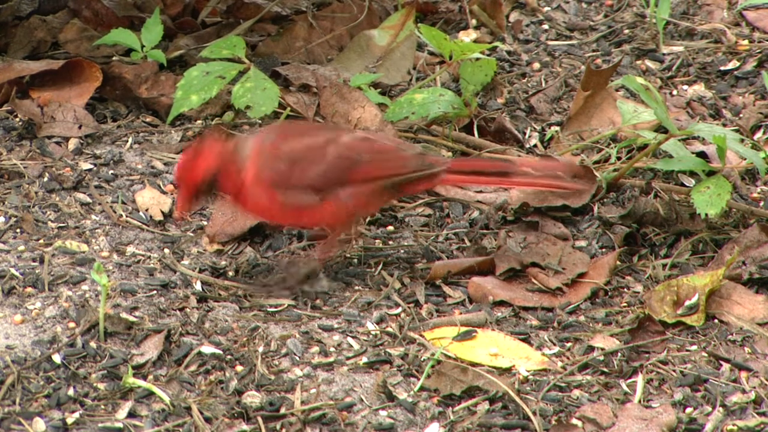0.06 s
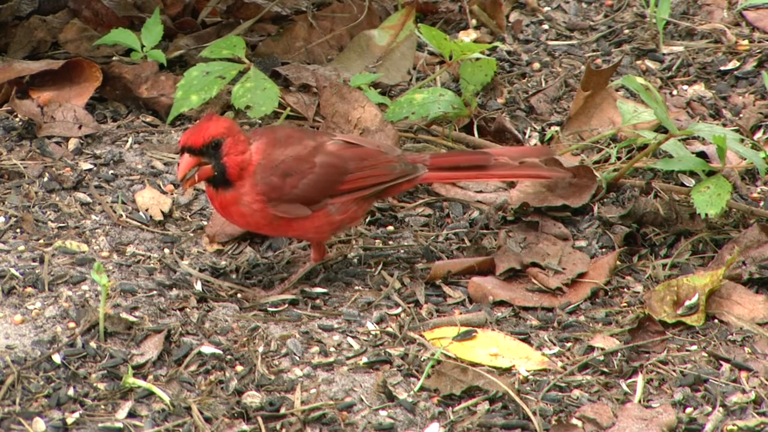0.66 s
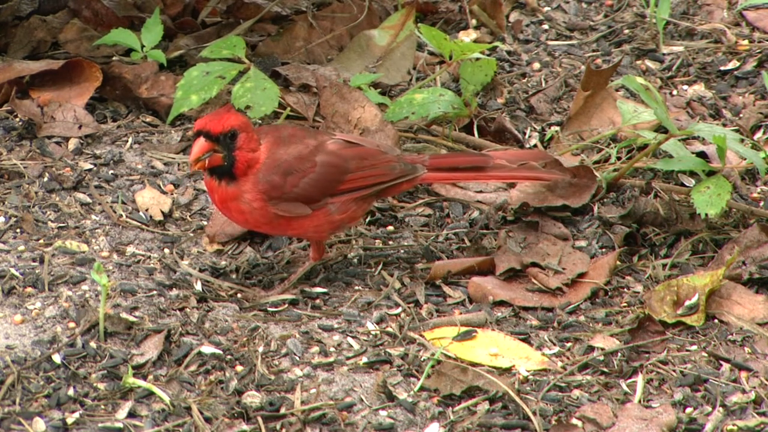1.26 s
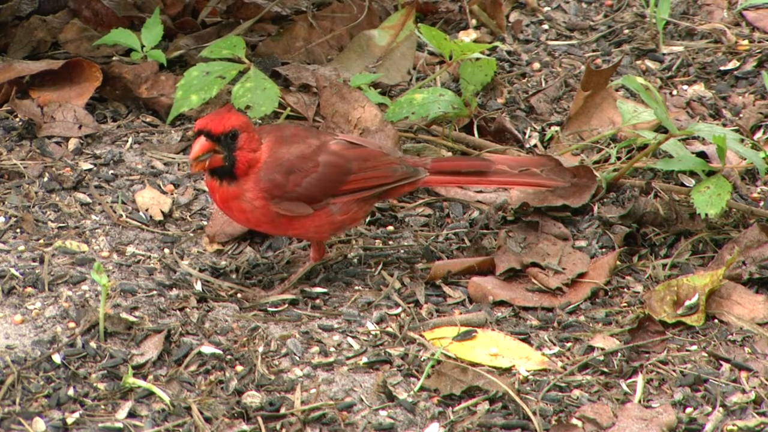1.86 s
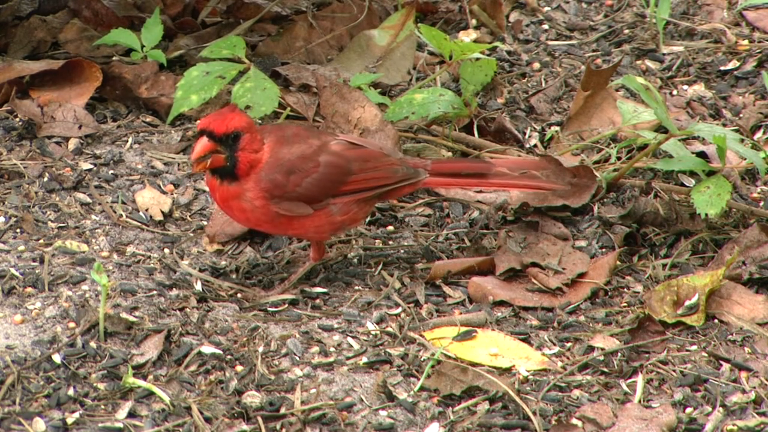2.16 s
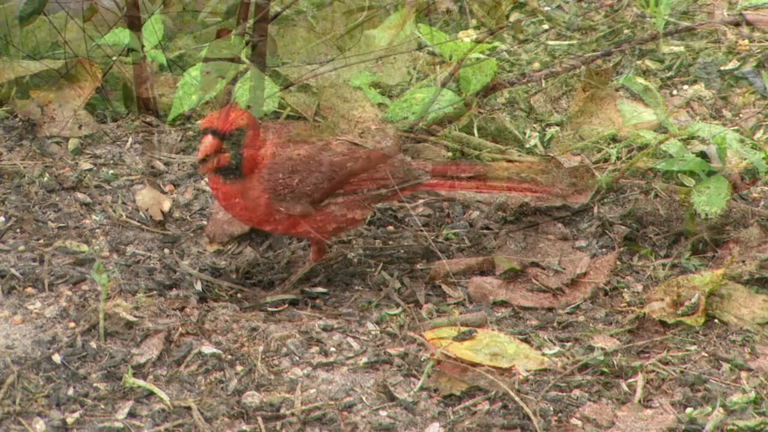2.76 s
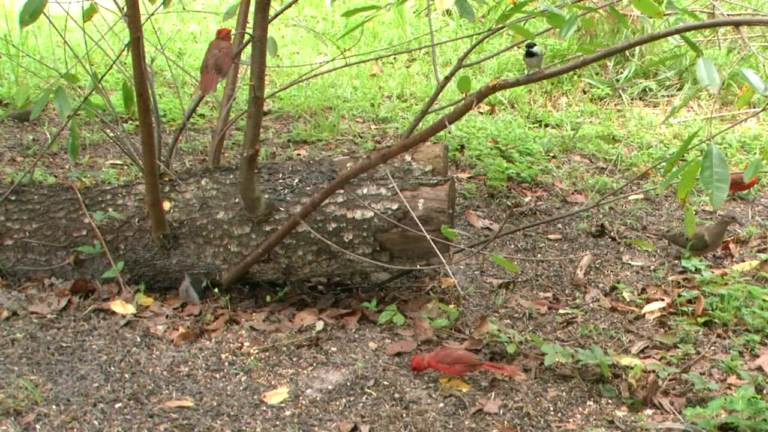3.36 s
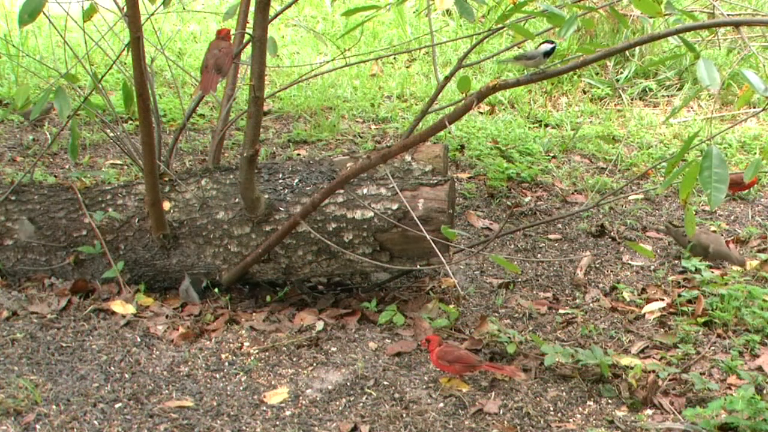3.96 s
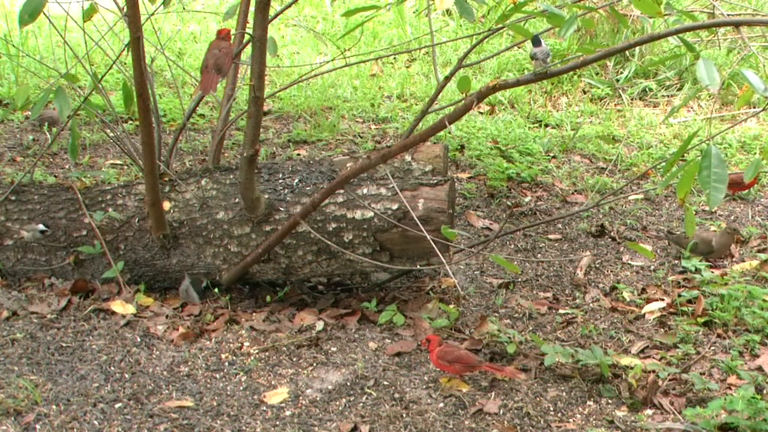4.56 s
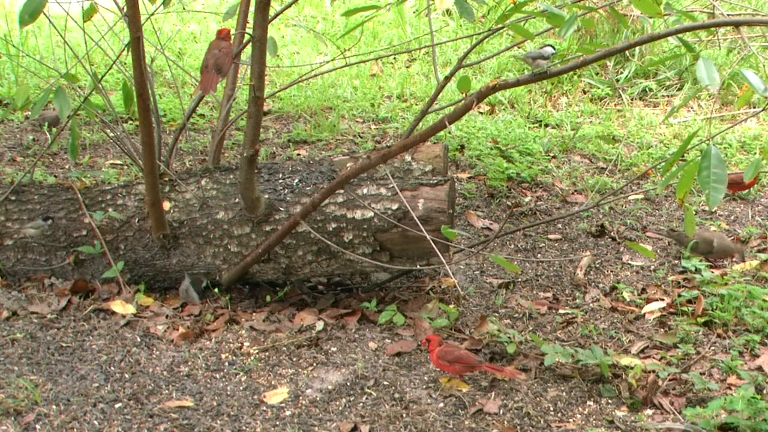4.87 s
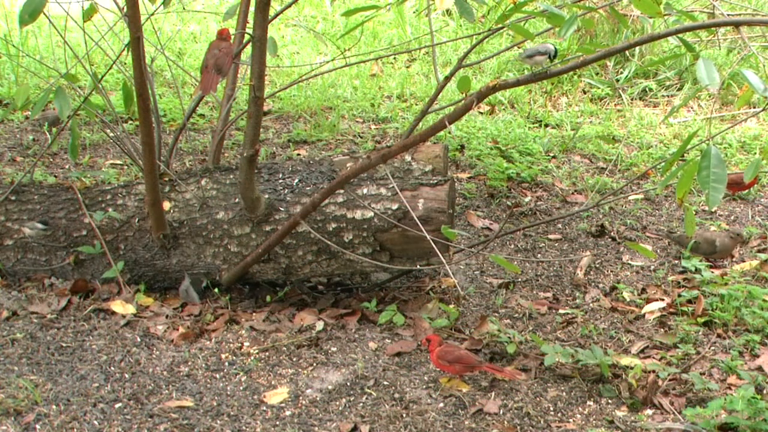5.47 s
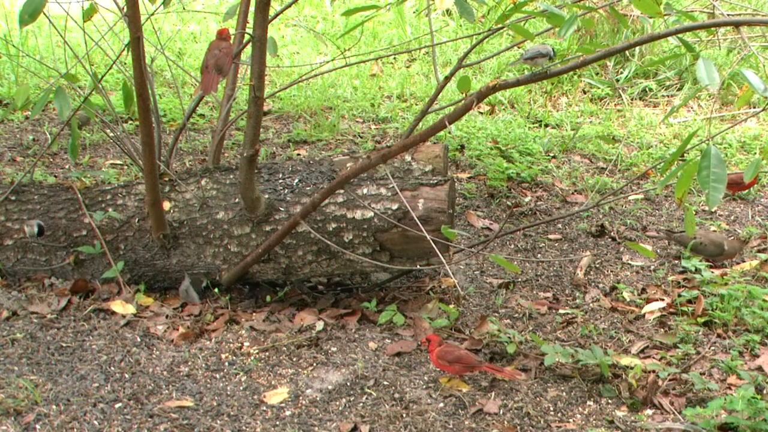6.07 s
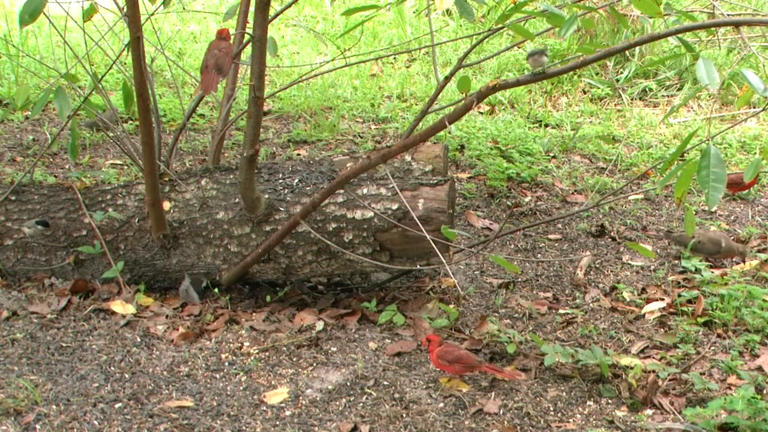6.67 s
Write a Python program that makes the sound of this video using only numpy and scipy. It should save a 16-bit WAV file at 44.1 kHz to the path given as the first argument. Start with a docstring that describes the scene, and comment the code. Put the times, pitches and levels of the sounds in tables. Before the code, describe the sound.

At the edge of a wood, high insects drone softly over a distant rumble and faint motor hum. Small songbirds give a few thin, sharp chips and a far buzzy trill. One loud chip leads straight into four hoarse chattering notes, and a second bird answers with two softer ones. A last chip follows. Seeds and dry leaves tick lightly throughout, and the calls carry a slight echo from the trees.

```python
"""A wood's edge. Throughout, high insects swell over far rumble and the hum of a distant machine,
while seeds and dry litter tick as small songbirds feed. A thin chip comes at 1.3 s, a far buzzy
trill at 1.8 s, then two more chips and, at 3.8 s, one loud arched note. Four hoarse two-voiced
'dee' notes follow at once and two softer ones answer; a faint chip and a last one at 6.6 s close.
Trunks and leaves scatter every call."""
import sys
import numpy as np
from scipy import signal
from scipy.fft import rfft, irfft, next_fast_len
from scipy.io import wavfile

SR = 44100
rng = np.random.default_rng(int(sys.argv[2]) if len(sys.argv) > 2 else 0)


def int16_out(signal):
    """Quantize to a 16-bit WAV file."""
    q = np.round(np.clip(np.atleast_2d(signal).T, -1, 1) * 32767)
    wavfile.write(sys.argv[1], SR, q.astype(np.int16))


N = 296793
T = np.arange(N) / SR
HISS_TOP_HZ = 13800


def from_db(db):
    return 10 ** (np.asarray(db) / 20)


def unit_rms(x):
    return x / np.sqrt(np.mean(x ** 2) + 1e-20)


def at_hz(points, hz):
    """Read a curve along a log-frequency axis."""
    known_hz, values = np.transpose(points)
    return np.interp(np.log(np.maximum(hz, 1)), np.log(known_hz), values)


def drift(rate_hz, size):
    """Random modulator of spread 1, gliding to a new value `rate_hz` times a second."""
    at = np.arange(size) * rate_hz / SR
    return np.interp(at, np.arange(size), rng.standard_normal(size)) * np.sqrt(3 / 2)


def envelope(start, end, attack_s, release_s):
    """Linear fade in, hold and fade out."""
    return np.clip(np.minimum((T - start) / attack_s, (end - T) / release_s), 0, 1)


def coloured_noise(spectrum, correlation=((1000, 0),), size=N):
    """Stereo noise of the given colour and left-right correlation; rms 1."""
    padded = next_fast_len(size, True)
    hz = np.fft.rfftfreq(padded, 1 / SR)
    white = rfft(rng.standard_normal((2, padded)))
    mid, side = white * from_db(at_hz(spectrum, hz)) * (hz < HISS_TOP_HZ)
    alike = np.clip(at_hz(correlation, hz), -.95, .95)
    stereo = np.sqrt(1 + alike) * mid + np.sqrt(1 - alike) * side * [[1], [-1]]
    return unit_rms(irfft(stereo, padded)[:, :size])


def place(x, pan_db=0., lead_ms=0.):
    """A bird to the left (positive values) is louder and earlier in the left ear."""
    shift_s = lead_ms / 2000
    return np.array([from_db(side * pan_db / 2) * np.interp(T + side * shift_s, T, x)
                     for side in (1, -1)])


def woods(x, near_db, far_db, near_t60=.09, far_t60=.42, predelay_s=.0023, width=.52, leaf_cut_hz=9500):
    """Twigs near the bird throw back a quick spray of echoes, the trees further off a thin tail."""
    t = np.arange(SR * 3 // 4) / SR
    response = 0
    for level_db, t60 in ((near_db, near_t60), (far_db, far_t60)):
        mid, side = rng.standard_normal((2, len(t))) * from_db(-60 * t / t60) * (t > predelay_s)
        echoes = np.array([mid + width * side, mid - width * side])
        response += from_db(level_db) * echoes / np.sqrt(np.sum(echoes ** 2) / 2)
    # leaves soak up the highest overtones
    response = signal.sosfilt(signal.butter(2, leaf_cut_hz, fs=SR, output="sos"), response)
    return signal.oaconvolve(x, response, axes=1)[:, :N]


def air(level_db=-55):
    """The bed: far rumble and leaf hiss, arriving steadily from all round."""
    # colour of the bed: f/Hz, relative level/dB
    spectrum = [(20, -33), (45, -27), (70, -12.5), (120, -9.5), (250, -2.5), (500, -1), (680, -1.5),
                (830, 0), (1100, -4.5), (2000, -8), (4500, -12.5), (7000, -14.5), (10000, -16),
                (13500, -20.5)]
    # its stereo image: f/Hz, left-right correlation
    correlation = [(60, 0.3), (130, -0.18), (290, -0.52), (640, -0.25), (1400, -0.22), (3100, 0.087),
                   (12000, 0.28)]
    return from_db(level_db) * coloured_noise(spectrum, correlation)


def machine(wander=.0019, ear_phase_rad=.93, rise_db_per_s=.44):
    """A far motor's hum wavers a little on its way through the air and slowly grows."""
    # motor partials: f/Hz, mid-scene level/dB
    partials = [(72, -91), (118.4, -83), (585, -65), (728, -74), (1168, -77), (2191, -76.5)]
    wavering_time = np.cumsum(1 + wander * drift(14, N)) / SR
    flutter_db = 1.2 * drift(8, N)
    ear_phases = np.array([[0], [ear_phase_rad]])
    hum = sum(np.sqrt(2) * from_db(level_db) * np.sin(2 * np.pi * hz * wavering_time - ear_phases)
              for hz, level_db in partials)
    return from_db(rise_db_per_s * (T - T.mean()) + flutter_db) * hum


def insects(chorus_db=-58.5, stroke_hz=63, throb=.16, wander=.0149):
    """Wing strokes pulse a narrow band of rasp; bouts swell out of the steady chorus and sink back."""
    # colour of the rasp: f/Hz, relative level/dB
    spectrum = [(6800, -30.5), (7500, -16), (8000, -7), (8350, -2.5), (8700, -2.5), (9050, -7.5),
                (9400, -17.5), (10000, -36)]
    # bouts of the nearest insect: start/s, end/s, level/dB
    bouts = [(0, .5, -57.5), (0.522, 1.217, -56.5), (1.27, 1.773, -57), (1.838, 2.3, -56.5),
             (2.332, 2.867, -56), (2.85, 3.27, -61), (3.27, 3.882, -56.5), (3.973, 4.64, -59),
             (4.95, 5.6, -59.5), (5.75, 6.41, -60.5), (6.46, 6.9, -59)]
    swells = sum(from_db(level_db) * envelope(start, end, attack_s=.17, release_s=.12)
                 for start, end, level_db in bouts)
    phase = 2 * np.pi * np.cumsum(stroke_hz * (1 + wander * drift(7.8, N))) / SR
    strokes = unit_rms(np.exp(throb * (np.cos(phase) + .5 * np.cos(2 * phase))))
    return np.hypot(from_db(chorus_db), swells) * strokes * coloured_noise(spectrum)


def litter(t60=.045):
    """Husks and dry leaves snap: a click with a brief crackle after it, duller for a ground peck."""
    # pecks and snaps: t/s, onset level/dB, band centre/Hz, nominal bandwidth/Hz
    ticks = [(0.166, -49, 2500, 4000), (.552, -52.5, 3300, 1600), (.856, -58, 9000, 6000),
             (1.803, -53, 7000, 8000), (2.249, -63, 9000, 6000), (2.609, -55, 9000, 6000),
             (3.667, -61, 9000, 6000), (4.093, -53, 10000, 6030), (4.705, -46, 10000, 6000),
             (5.427, -69, 10000, 6000), (6.325, -60, 9900, 6000), (6.529, -48.5, 7040, 10000)]
    out = np.zeros((2, N))
    t = np.arange(SR // 25) / SR
    for start, level_db, hz, width_hz in ticks:
        edges_hz = np.clip([hz - width_hz / 2, hz + width_hz / 2], 300, HISS_TOP_HZ)
        band = signal.butter(4, edges_hz, "band", fs=SR, output="sos")
        crackle = signal.sosfilt(band, rng.standard_normal((2, len(t))))
        at = round(start * SR)
        out[:, at:at + len(t)] += from_db(level_db - 60 * t / t60) * unit_rms(crackle)
    return out


def whistle(call, overtone_db=-50, buzz_depth=0, buzz_hz=140, waver=.0078, bend_s=.0068):
    """One side of the syrinx sweeps a near sine; a fast trill of its tension makes a buzz."""
    start, length, mid_hz, glide, entry_bend, exit_bend, level_db, attack_s, release_s = call
    throat_hz, throat_width_hz, throat_db = 7000, 1800, 31
    best_hz, loss_db_per_octave = 6800, 25
    on, out = (T > start) & (T < start + length), np.zeros(N)
    t = T[on] - start
    bend = entry_bend * np.exp(-(t / bend_s) ** 2) + exit_bend * np.exp(-((length - t) / bend_s) ** 2)
    pitch = mid_hz * 2 ** (glide * (t - length / 2) + bend)
    pitch *= 1 + waver * drift(600, N)[on] + buzz_depth * np.sin(2 * np.pi * buzz_hz * t)
    phase = 2 * np.pi * np.cumsum(pitch) / SR
    tone = np.sin(phase)
    # overtones step down by 6 dB, and flare when a low pitch brings them into the throat's resonance
    for k in (2, 3, 4):
        flare_db = throat_db / (1 + ((k * pitch - throat_hz) / throat_width_hz) ** 4)
        tone += from_db(overtone_db + 6 * (4 - k) + flare_db) * (k * pitch < SR / 2) * np.sin(k * phase)
    # the note fades as it drops below the bird's best range
    loss_db = loss_db_per_octave * np.maximum(np.log2(best_hz / pitch), 0)
    out[on] = np.sqrt(2) * from_db(level_db - loss_db) * tone
    return out * envelope(start, start + length, attack_s, release_s)


def far_buzz():
    """A hidden bird's fading trill, half lost in its own echoes."""
    # the trill: t/s, length/s, mid pitch/Hz, glide/(octaves/s), entry bend/octaves, exit bend/octaves,
    # base level/dB, attack/s, release/s
    call = (1.816, .14, 7080, 1.0, -.1, 0, -57, .004, .07)
    direct = place(whistle(call, buzz_depth=.1, buzz_hz=170))
    return direct + woods(direct, near_db=-4, far_db=3)


def chips(ground_echo_db=-6):
    """Contact calls from several perches sweep through their own ground echo; far ones are wetter."""
    # whistled chips: t/s, length/s, mid pitch/Hz, glide/(octaves/s), entry bend/octaves,
    # exit bend/octaves, base level/dB, attack/s, release/s, 4th harmonic before flare/dB,
    # pan left/dB, left lead/ms, ground echo delay/ms, near echoes/dB, far echoes/dB
    calls = [(1.313, 0.047, 6530, -11.5, -0.026, -.2, -33, .012, 0.014, -35, -1.5, .16, 1.21, -7.5, -7.5),
             (3.1372, .031, 7243, -0.5, 0.014, 0.17, -26, 0.013, 0.0042, -31, 3, -.11, 1.36, -7.5, -10),
             (3.5342, 0.032, 7950, -3, 0.26, 0.015, -35, 0.0024, 0.0075, -60, 1, 0, 0.79, -5.5, -13),
             (3.7583, 0.054, 7110, -6, -1.8, -1.7, -18.5, 0.0016, 0.0022, -36, -.4, 0, 2.85, -4.5, -12.5),
             (4.863, 0.025, 7330, -8, 0, 0, -64, .01, .01, -50, 0, 0, 0.78, .5, -1),
             (6.553, 0.039, 6650, -15.5, 0.0062, -.25, -38, 0.0071, 0.012, -36, -4.5, -.024, .76, -9, -5.5)]
    out = np.zeros((2, N))
    for *call, overtone_db, pan_db, lead_ms, ground_ms, near_db, far_db in calls:
        voice = whistle(call, overtone_db)
        bounce = np.interp(T - ground_ms / 1000, T, voice)
        panned = place(voice + from_db(ground_echo_db) * bounce, pan_db, lead_ms)
        out += panned + woods(panned, near_db, far_db)
    return out


def dee(note, throat, sideband_loss_db, width_hz):
    """Both sides of the syrinx drive each other: each harmonic splits into lines spaced by their beat."""
    start, end, low_hz, high_hz, level_db, throat_hz, resonance_db, rise_s, depth, roughness = note
    scoop_depth, sag_depth, flick_depth, flick_s = .11, .012, .26, .00748
    jitter, shimmer_db, breath_db, bright_db_per_octave = .04, 2.5, -9, 7.5
    on, out = (T > start) & (T < end), np.zeros(N)
    t = T[on] - start
    size, longest = len(t), SR // 4
    # the note scoops up to pitch, sags a little and ends in a downward flick
    scoop = np.maximum(1 - t / rise_s, 0)
    flick = np.exp((T[on] - end) / flick_s)
    arch = (1 - scoop_depth * scoop ** 2 - sag_depth * (t / (end - start)) ** 2
            - flick_depth * flick) ** depth
    # the throat resonance sweeps further than the pitch and picks out one line after another
    resonance_hz = throat_hz * arch ** 2.64
    # the membranes run unevenly as they start and stop: rough, bright ends and a clearer middle
    rasp = roughness * (.15 + scoop + flick)
    low, high = [hz * arch * (1 + jitter * rasp * drift(900, longest)[:size]) for hz in (low_hz, high_hz)]
    beat_hz = high - low
    voice = 0
    for harmonic in range(1, 8):
        bright_db = bright_db_per_octave * rasp * np.log2(harmonic / 2)
        for step in range(-4, harmonic + 5):
            hz = harmonic * low + step * beat_hz
            split_db = -sideband_loss_db * max(abs(step - harmonic / 2) - 1, 0)
            peak_db = resonance_db / (1 + ((hz - resonance_hz) / width_hz) ** 2)
            # the lower voice's octave stands out in the scoop and the flick
            hook_db = 6 * (.5 * scoop + np.sqrt(flick)) * (harmonic == 2 and step == 0)
            line_db = at_hz(throat, hz / arch) + peak_db + split_db + bright_db + hook_db
            gain = from_db(line_db + shimmer_db * drift(37, longest)[:size])
            voice += gain * np.sin(2 * np.pi * (np.cumsum(hz) / SR + rng.random()))
    # air rushes through in puffs, one to each beat
    puffs = 1 + .5 * np.cos(2 * np.pi * np.cumsum(beat_hz) / SR)
    breath = from_db(breath_db) * np.sqrt(rasp) * puffs * coloured_noise(throat, size=longest)[0, :size]
    out[on] = from_db(level_db - 2 * scoop) * unit_rms(unit_rms(voice) + breath)  # softer while it climbs
    return out * envelope(start, end, attack_s=.013, release_s=.01)


def chatter():
    """One bird calls four hoarse dees and another gives two softer ones in answer."""
    # dee notes: bird, start/s, end/s, lower voice/Hz, upper voice/Hz, level/dB, throat resonance/Hz,
    # its boost/dB, rise/s, depth of the pitch arch, roughness 0-1
    notes = [("caller", 3.835, 3.938, 1668, 1882, -36, 3400, 3.1, .07, 1.1, 0.42),
             ("caller", 3.961, 4.068, 1735, 1932, -35.5, 3640, 8.3, 0.036, 0.97, 0.59),
             ("caller", 4.098, 4.208, 1692, 1895, -37, 3500, 5.5, .08, 1.2, .66),
             ("caller", 4.234, 4.332, 1684, 1901, -37.5, 3850, 4.6, 0.065, 1.15, 0.61),
             ("answerer", 4.336, 4.484, 1618, 1934, -42.5, 3200, 16.5, 0.0345, 0.79, .55),
             ("answerer", 4.511, 4.634, 1700, 1988, -43, 3700, 12, .055, 1.5, .95)]
    # colour of each bird's throat: f/Hz, gain/dB
    caller_throat = [(1200, -34), (1780, -5.5), (2300, -19), (2850, -18), (3250, -2.5), (3950, 3.5),
                     (4420, -2.5), (5000, -0.5), (5600, -7.5), (6200, -14.5), (7100, -14), (8000, -21.5),
                     (11000, -23.5), (14000, -38)]
    answering_throat = [(1200, -35), (1800, -1), (2400, -18.5), (3200, -7), (4200, 0), (5000, -2),
                        (5700, -13), (7100, -19), (8000, -22), (14000, -36)]
    call = sum(dee(note, caller_throat, sideband_loss_db=2, width_hz=180)
               for bird, *note in notes if bird == "caller")
    answer = sum(dee(note, answering_throat, sideband_loss_db=.5, width_hz=120)
                 for bird, *note in notes if bird == "answerer")
    both = place(call, pan_db=.5) + place(answer, pan_db=2.3)
    return both + woods(both, near_db=-11.5, far_db=-9.5)


def scene():
    """Birds and ticking litter in front of a bed of insects, air and hum."""
    return chips() + far_buzz() + chatter() + litter() + insects() + air() + machine()


def record(dry):
    """A steep low-pass takes the very top off the mix."""
    cutoff_hz = 15300
    return signal.sosfilt(signal.ellip(10, .1, 80, cutoff_hz, fs=SR, output="sos"), dry)


dry = scene()
out = record(dry)
int16_out(out)
```